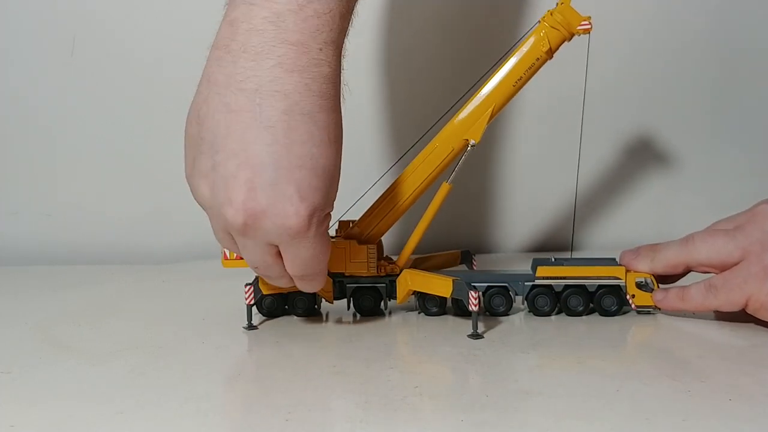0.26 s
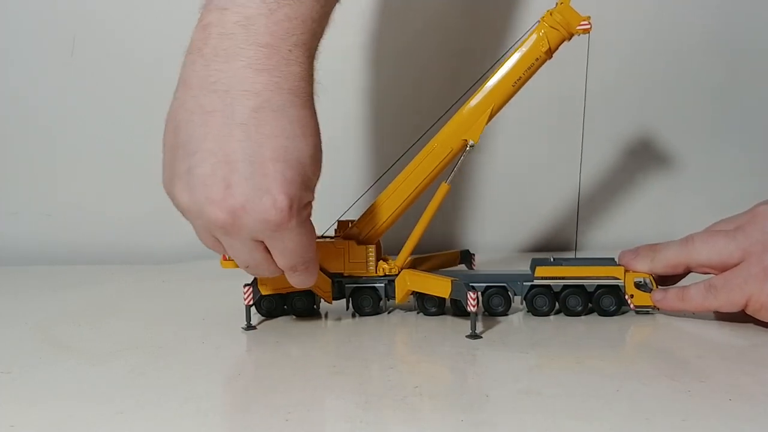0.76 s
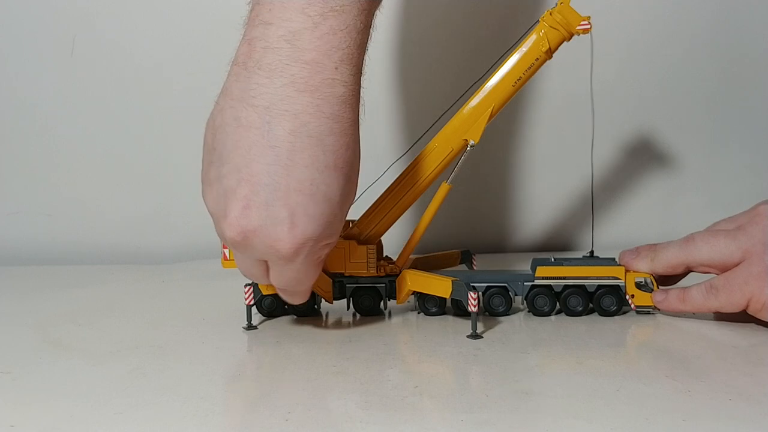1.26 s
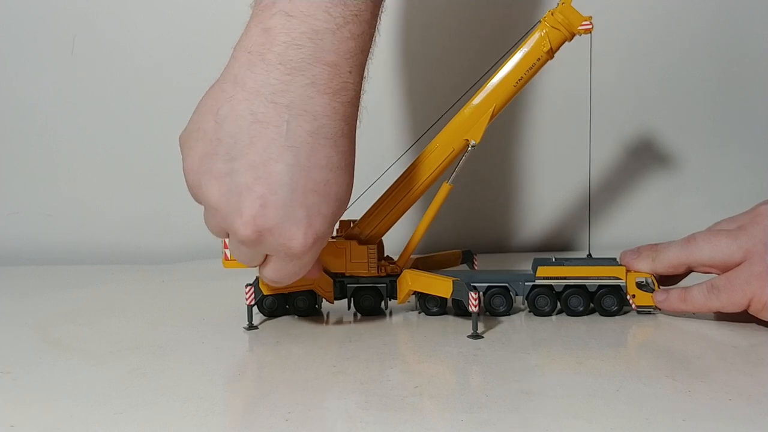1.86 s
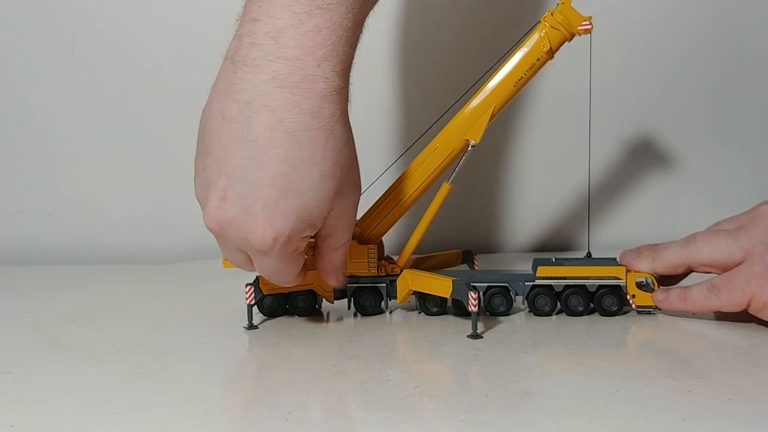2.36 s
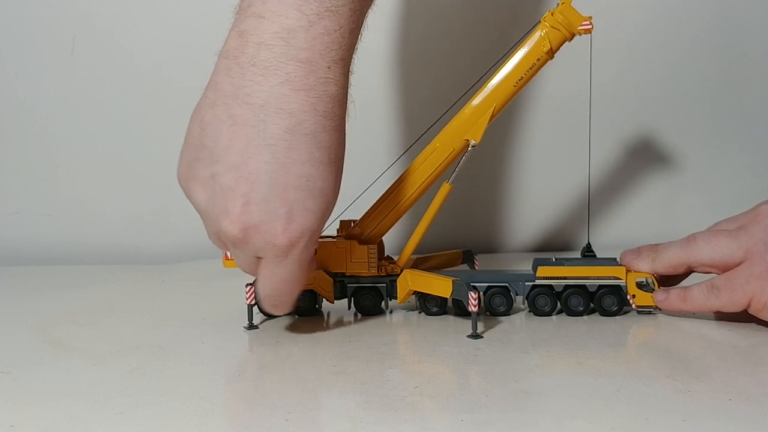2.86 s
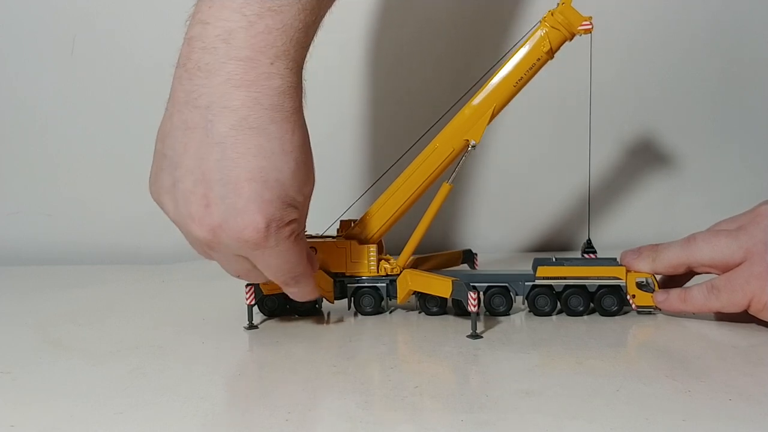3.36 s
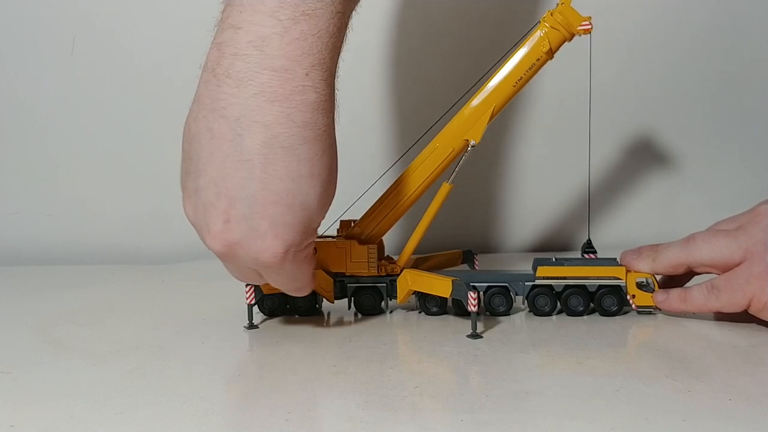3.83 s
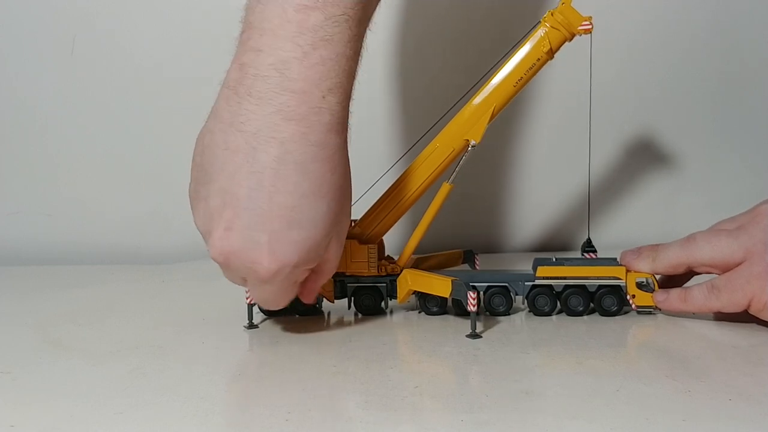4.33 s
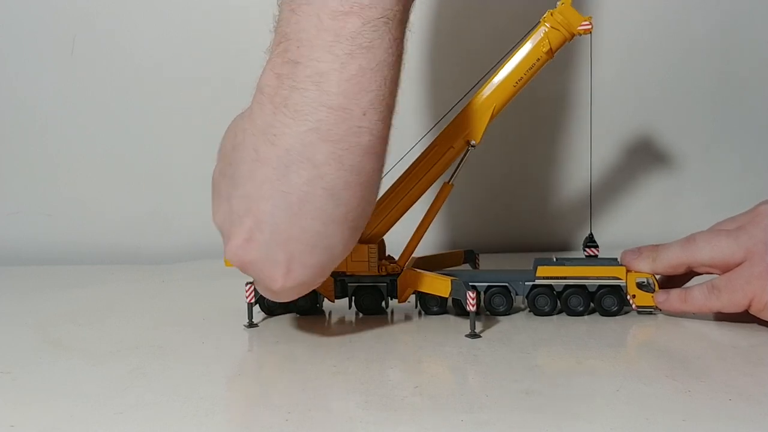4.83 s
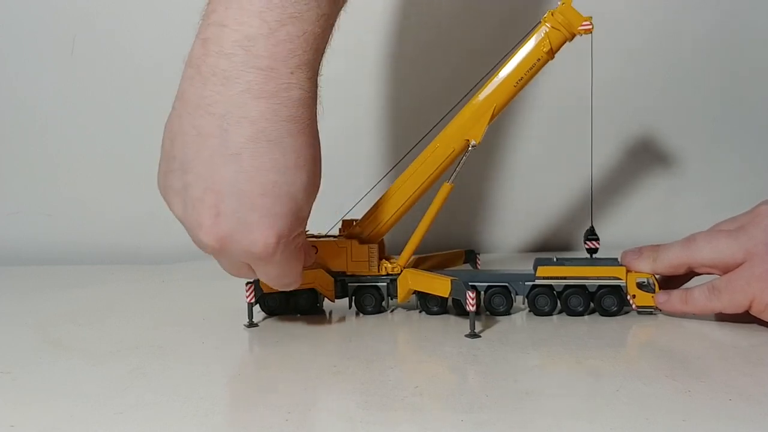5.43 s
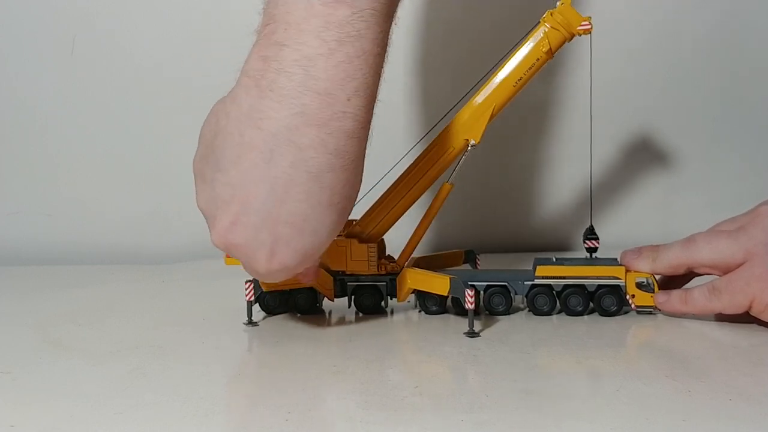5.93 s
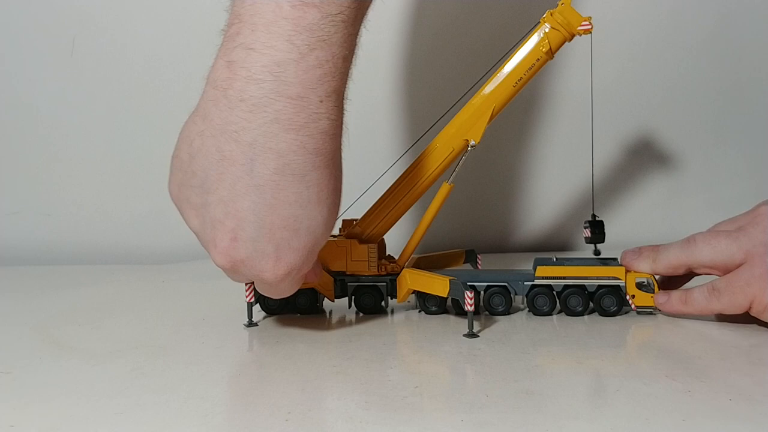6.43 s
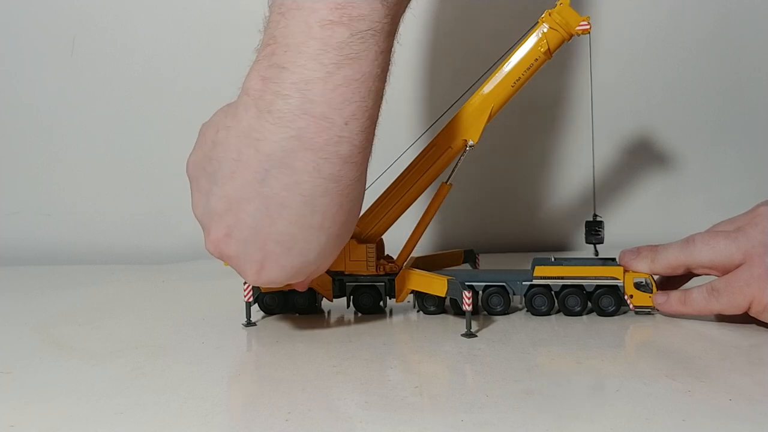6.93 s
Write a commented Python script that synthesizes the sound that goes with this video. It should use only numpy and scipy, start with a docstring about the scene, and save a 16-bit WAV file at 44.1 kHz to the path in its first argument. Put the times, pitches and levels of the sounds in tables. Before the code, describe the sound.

Soft bursts of tiny winch clicks and finger bumps come from a metal toy crane, which briefly rattles on a table.

```python
"""A die-cast model crane, wound by hand with a small key in short turns, on a table in a quiet room.
Heard close, through a camera's microphone. The winch slips in clicks that ring the metal body; the
fingers rub, bump and faintly squeak. The key snaps in its socket, and once it snaps free so that the
chassis rattles on its outriggers. Light taps and small ticks come mostly during the turns."""
import sys
import numpy as np
from scipy import signal
from scipy.fft import rfft, irfft, next_fast_len
from scipy.io import wavfile
from scipy.ndimage import uniform_filter1d

SR = 44100
rng = np.random.default_rng(int(sys.argv[2]) if len(sys.argv) > 2 else 0)


def put_to_file(sound):
    """Save the sound as 16-bit audio at rate SR, in the file named by the first command-line argument."""
    columns = np.atleast_2d(sound).T  # one column per channel
    safe = np.clip(columns, -1, 1)
    whole_steps = np.round(safe * 32767)
    wavfile.write(sys.argv[1], SR, whole_steps.astype(np.int16))


N = 316811
AGE = np.arange(SR // 2) / SR  # seconds since a blow
EASY_STROKE_DB, SCRAPE_GROWTH = -51.5, 0.78  # scrape and faint clicks gain 0.78 dB per dB of effort

# strokes of the fingers on the key: start_s, end_s, effort_db
STROKES = [(-.1, 0.06, -51.5), (0.288, 0.434, -58.5), (0.69, 0.987, -54), (0.974, 1.129, -66),
           (1.237, 1.359, -47), (1.356, 1.538, -52), (1.624, 1.853, -64.5), (1.967, 2.466, -55.5),
           (2.57, 2.676, -44), (3.83, 4.317, -52), (4.002, 4.109, -45), (4.308, 4.433, -52.5),
           (4.73, 4.952, -50), (5.102, 5.352, -61), (5.979, 6.132, -39), (6.13, 6.317, -45.5),
           (6.265, 6.532, -53.5), (6.85, 7.118, -58)]
# rumble of the hand through the table: frequency_hz, gain_db
RUMBLE_COLOUR = [(25, -15.5), (50, -9), (90, 0.5), (170, -6.5), (240, -12), (400, -20), (900, -35),
                 (3000, -59), (7000, -82)]
# scrape of skin on the key: frequency_hz, gain_db
SCRAPE_COLOUR = [(150, 0), (330, 6), (600, 3), (1300, -2), (1800, -8), (2400, -5), (4000, -7), (5000, -18),
                 (6300, -36), (12000, -46)]
# room tone: frequency_hz, gain_db
AIR_COLOUR = [(15, -50), (25, -12), (82, -1), (104, -11), (183, -21.5), (298, -25.5), (340, -11.5),
              (367, -16), (429, -17.5), (797, -29.5), (1010, -29), (1300, -32.5), (2070, -31), (6130, -42),
              (12000, -50), (15600, -87), (22000, -120)]
# a dip in the room tone's treble: frequency_hz, gain_db
AIR_DIP = [(3500, -1.5), (5300, -0.5), (6200, -16), (6900, -11), (7700, -4), (12000, -4)]

# the clearest winch clicks: start_s, level_db
CLICKS = [(.1048, -63.5), (.3479, -52), (.382, -44.5), (.7439, -58.5), (0.8058, -54.5), (.839, -41.5),
          (.906, -57), (0.9299, -52.5), (1.2998, -42), (1.3144, -45), (1.3427, -42), (1.44, -48),
          (1.64, -48.5), (1.7658, -52), (2.0569, -48), (2.149, -53), (2.1755, -37), (2.255, -49),
          (2.328, -53), (2.357, -46.5), (2.5675, -59.5), (2.5907, -73), (2.6524, -49), (3.4664, -59),
          (3.908, -53.5), (3.9996, -36), (4.041, -43), (4.082, -37), (4.1661, -46.5), (4.244, -49),
          (4.348, -45), (4.6329, -53.5), (4.787, -47.5), (4.808, -47), (4.9076, -37), (5.2689, -51.5),
          (6.047, -42.5), (6.0872, -40), (6.1644, -48), (6.172, -44.5), (6.2163, -38), (6.2292, -46.5),
          (6.267, -52.5), (6.3144, -37.5), (6.3738, -49.5), (6.414, -43.5), (6.49, -50), (6.9059, -63),
          (6.986, -58)]
# first crack of a click: frequency_hz, gain_db
CLICK_COLOUR = [(300, -37), (1000, 12.5), (1800, -4.5), (3000, 7.5), (4200, 7), (5000, -3.5), (6200, -20.5),
                (12000, -35)]
# ring of the winch housing: pitch_hz, level_db, t60_s
WINCH_MODES = [(1470, -2, 0.059), (2295, -0.5, 0.071), (3027, 2.5, 0.083), (2860, -9.5, 0.029),
               (3060, -50, .08), (3755, -2.5, 0.05), (3680, 1, 0.1), (3790, 2.5, 0.079), (3667, -9, 0.067),
               (4590, -11, .09), (4560, -3, 0.062), (4770, -11, 0.077)]
# ring of the model on its table top: pitch_hz, level_db, t60_s
BODY_MODES = [(81, -17, 0.95), (191.4, -11, 0.049), (271.7, -3, 0.23), (330, 1, 0.31), (427.6, -2.5, 0.32),
              (512.5, -7, 0.36), (530, -14.5, 0.1), (666, -12.5, 0.23), (769.7, -5.5, 0.25),
              (820, -8, 0.035), (1090, -12.5, 0.035), (1253, -7.5, 0.04)]
# dull knock of the hollow body: frequency_hz, gain_db
HOLLOW_COLOUR = [(100, -15.5), (200, -7), (320, 3.5), (480, 3.5), (730, 0.5), (1300, -11.5), (2500, -20.5),
                 (6000, -56.5)]
# bright edge of a hard contact: frequency_hz, gain_db
EDGE_COLOUR = [(3000, -52), (6300, -12.5), (7300, -2.5), (8700, -0.5), (10000, -9.5), (11300, -13),
               (12500, -3)]
# the key snaps in its socket: start_s, level_db, edge_db, ping_hz
SNAPS = [(0.2745, -53.5, -72.5, 2150), (1.268, -41, -60.5, 2980), (1.276, -36, -73, 2965),
         (1.4484, -35, -80, 2850), (1.493, -35, -49.5, 3700), (1.679, -41.5, -57.5, 3030),
         (1.8629, -52, -67, 2400), (2.965, -61, -74.5, 2478), (4.4466, -49, -68.5, 2560),
         (4.53, -53, -69.5, 2560), (4.8855, -27.5, -44, 2270)]
# first crack of a snap: frequency_hz, gain_db
SNAP_COLOUR = [(300, 4.5), (1000, -26), (1600, 1), (2400, -1), (3400, -8.5), (4800, -2), (6200, -23.5),
               (12000, -104)]

# the fingers bump the model: start_s, level_db, pitch_hz
BUMPS = [(.342, -41.5, 121), (.47, -39, 172.6), (.895, -45, 111), (1.277, -34, 100), (1.303, -53, 100.2),
         (1.493, -40.5, 135), (1.865, -33.5, 170.3), (2.309, -38, 136.7), (2.585, -46, 42.9),
         (2.6, -44, 82.4), (2.592, -37, 162), (2.617, -40.5, 162.8), (4.045, -42, 100), (4.376, -45.5, 330),
         (4.787, -40, 106), (4.89, -34, 169), (6.003, -33, 156), (6.166, -31.5, 97), (6.22, -42, 254.5)]
# small pitched ticks: start_s, level_db, pitch_hz
TICKS = [(1.114, -49, 2265), (1.449, -40, 1850), (1.687, -41.5, 2040), (1.711, -45, 2120),
         (4.303, -47, 2570), (4.531, -42, 2365), (5.683, -48.5, 2325), (6.002, -48.5, 2305),
         (6.02, -48, 2150), (6.035, -44.5, 2260), (6.464, -48, 1414), (6.646, -56, 2250)]
# light taps on the body: start_s, level_db, pitch_hz
TAPS = [(2.176, -45, 780), (2.919, -59, 1475), (3.295, -51.5, 1370), (3.317, -56, 1340),
        (3.967, -47.5, 1271), (4.3635, -42.5, 1120), (4.376, -46.5, 1258), (4.786, -43.5, 1546),
        (4.886, -37.5, 1553), (6.008, -43.5, 950)]

# the chassis rocks on the table and settles: start_s, level_db
BOUNCES = [(4.9377, -23.5), (4.948, -30), (4.9871, -31.5), (5.0129, -34.5), (5.023, -43), (5.057, -37.5),
           (5.082, -48)]
# first crack of an outrigger: frequency_hz, gain_db
BOUNCE_COLOUR = [(300, 8.5), (1000, -2), (1500, 5.5), (2300, 8.5), (3200, 4.5), (4400, 11), (5200, -4),
                 (6200, -31), (12000, -46)]
# ring of the whole chassis and boom: pitch_hz, level_db, t60_s
CHASSIS_MODES = [(1500, -9, .12), (2056, -9, .15), (2256, -7, .12), (2329, -9, .15), (2449, -9, .15),
                 (2650, -10, .17), (3031, -8, .14), (3542, -2, .19), (3650, -2, .19), (3850, -6, .12),
                 (4048, -3, .15), (4274, -5, .14), (4360, -1, .17), (4662, -4, .14), (5063, -11, .12)]
# thud of the outriggers on the table: pitch_hz, level_db, t60_s
THUD_MODES = [(187, -15, 0.29), (252, -3.5, 0.1), (280.5, -0.5, 0.13), (327, -4, 0.19), (367, -11.5, 0.16),
              (453, -9, 0.11), (656, -20.5, 0.068)]

# noise around a damped resonance: pitch_ratio, gain_db
SKIRT = [(1 / 3, -40), (1 / 1.3, -14), (1, 0), (1.3, -14), (2, -40), (8, -80)]
# unequal colour of the microphone's two sides: frequency_hz, left_minus_right_db
BALANCE = [(35, -8.5), (90, 0), (300, 2.5), (600, -0.5), (2500, 0), (3800, 5), (4600, 2.5), (5400, 21.5),
           (6600, 8), (8200, 2), (9500, 2), (12000, -1.5)]
# likeness of the microphone's two channels: frequency_hz, correlation
LIKENESS = [(30, 0.33), (90, 0.79), (200, 1), (500, 0.35), (1500, 0.037), (5000, 0.013)]


def undb(db):
    """Decibels to gain."""
    return 10 ** (np.asarray(db) / 20)


def along(points, hz):
    """Read (Hz, value) points on a log-frequency axis."""
    point_hz, values = np.transpose(points)
    return np.interp(np.log(hz + 1), np.log(point_hz), values)


def colour(x, points):
    """Minimum-phase filter with the given (Hz, dB) response."""
    n = 2 * next_fast_len(x.shape[-1])
    gain = undb(along(points, np.arange(n // 2 + 1) * SR / n))
    cepstrum = irfft(np.log(gain))
    cepstrum[1:n // 2] *= 2
    cepstrum[n // 2 + 1:] = 0
    return irfft(rfft(x, n) * np.exp(rfft(cepstrum)))[..., :x.shape[-1]]


def unit(x):
    """Scale to rms 1."""
    return x / np.sqrt(np.mean(x ** 2))


def unit_attack(x):
    """Scale a blow to rms 1 over its first 23 ms."""
    return x / np.sqrt(np.mean(x[:, :1024] ** 2))


def fade(t60):
    """Decay by 60 dB in t60 seconds."""
    return np.exp(-np.log(1000) * AGE / t60)


def stereo_noise(size):
    """Noise at the microphone: alike on both sides in the bass, unrelated in the treble."""
    mid, side = rfft(rng.standard_normal((2, size)), 2 * next_fast_len(size // 2 + 1))
    likeness = np.clip(along(LIKENESS, np.linspace(0, SR / 2, len(mid))), -1, 1)
    mid, side = mid * np.sqrt(1 + likeness), side * np.sqrt(1 - likeness)
    return unit(irfft(np.array([mid + side, mid - side]))[:, :size])


def add(out, start_s, x):
    """Mix x in at start_s."""
    i = max(int(start_s * SR), 0)
    out[:, i:i + x.shape[1]] += x[:, :max(N - i, 0)]


def ring(modes, scatter_db, detune):
    """Damped modes; each blow shares its force differently among them."""
    hz, db, t60 = np.transpose(modes)[:, :, None]
    size, drift, sign, skew = rng.standard_normal((4, len(modes), 1))
    strength = np.sign(sign) * undb(db + scatter_db * size)
    waves = strength * fade(t60) * np.exp(2j * np.pi * hz * (1 + detune * drift) * AGE)
    turn = np.exp(1j * skew * np.minimum(hz / 1100, .7))  # high modes reach the two sides out of step
    return unit_attack(np.array([(waves * turn).sum(0).imag, (waves / turn).sum(0).imag]))


def crack(points, t60, tail_db, tail_t60):
    """The contact itself: a noise burst and a short wash of dense small-part modes."""
    noise = stereo_noise(len(AGE)) + 0.41 * rng.standard_normal(len(AGE))
    envelope = fade(t60) + undb(tail_db) * fade(tail_t60)
    return unit_attack(colour(noise * envelope, points))


def pips(rows, rise_cycles=4, grit=.7, ring_db=-16, ring_t60=.07, gain_db=0):
    """Each touch swells one resonance for a few cycles and leaves a faint ring; noise roughens it."""
    out = np.zeros((2, N))
    for start_s, db, hz in rows:
        push = AGE * hz / rise_cycles
        envelope = push * np.exp(1 - push) + undb(ring_db) * fade(ring_t60) * (1 - np.exp(-push))
        skirt = [(ratio * hz, gain) for ratio, gain in SKIRT]
        roughness = unit(colour(stereo_noise(len(AGE)), skirt))
        pip = envelope * (np.sin(2 * np.pi * hz * AGE) + grit * roughness)
        add(out, start_s, undb(db + gain_db) * pip / np.abs(pip).max())
    return out


def room_tone(level_db=-62.5, sway_db=1.0, sway_hz=5):
    """Still air all round the microphone; its low rumble sways a little."""
    noise = undb(level_db) * unit(colour(colour(stereo_noise(N), AIR_COLOUR), AIR_DIP))
    low = signal.sosfiltfilt(signal.butter(2, 300, fs=SR, output="sos"), noise)
    steps = np.linspace(0, N / SR, int(sway_hz * N / SR) + 2)
    sway = np.interp(np.arange(N) / SR, steps, rng.standard_normal(len(steps)))
    return noise + (undb(sway_db * sway) - 1) * low


def swells(t):
    """Rise and fall of the strokes at times t, from 0 to 1, one row a stroke."""
    start, end, _ = np.transpose(STROKES)[:, :, None]
    return np.sin(np.pi * np.clip((t - start) / (end - start), 0, 1))


def finger_rub(hold_db=-61, rumble_db=-2, scrape_db=-62, contacts=10, slips_per_s=50, spread_db=6):
    """Skin drags on the key: each stroke swells a rumble through the table and a crackly scrape."""
    effort = np.transpose(STROKES)[2, :, None]
    swell = swells(np.arange(N) / SR)
    rumble_gain = undb(hold_db) + (undb(effort + rumble_db) * swell).sum(0)  # a resting hand trembles
    scrape_gain = (undb(scrape_db + SCRAPE_GROWTH * (effort - EASY_STROKE_DB)) * swell).sum(0)
    scrape = 0
    for _ in range(contacts):  # each point of skin sticks and slips with a colour of its own
        slips = rng.random(N) < slips_per_s / SR
        force = slips * undb(spread_db * np.minimum(rng.exponential(size=N), 2))
        grain = crack(SCRAPE_COLOUR, t60=.022, tail_db=-4, tail_t60=.053)
        scrape += signal.fftconvolve(force[None], grain, axes=1)[:, :N]
    rumble = colour(stereo_noise(N), RUMBLE_COLOUR)
    return rumble_gain * unit(rumble) + scrape_gain * unit(scrape)


def grip(t, rest_db=-64):
    """How hard the fingers press at times t, in dB above an easy stroke."""
    effort = np.transpose(STROKES)[2, :, None]
    pressure = undb(rest_db) + (undb(effort) * swells(t)).sum(0)
    return 20 * np.log10(pressure) - EASY_STROKE_DB


def faint_clicks(count=30, level_db=-58, spread_db=2.5):
    """The winch also slips faintly, at uneven steps while the key turns: rows of start_s, level_db."""
    start, end, _ = np.transpose(STROKES)
    turned_s = np.cumsum(end - start)
    place, size = rng.random((count, 2)).T
    slip_s = turned_s[-1] * (np.arange(count) + place) / count
    stroke = np.searchsorted(turned_s, slip_s)
    start_s = end[stroke] - (turned_s[stroke] - slip_s)
    db = level_db + SCRAPE_GROWTH * grip(start_s) + spread_db * (2 * size - 1)
    return list(zip(start_s, db))


def winch_clicks(firm_db=-42, hardening=.13, coupling=.37, max_grip_db=12):
    """Each slip rings the housing; hard slips are brighter, and a firm grip passes more to the body."""
    out = np.zeros((2, N))
    for start_s, db in CLICKS + faint_clicks():
        edge_db = db + hardening * (db - firm_db)
        body_db = db + coupling * min(grip(start_s)[0], max_grip_db)
        click = undb(db - 15) * crack(CLICK_COLOUR, t60=.052, tail_db=3, tail_t60=.063)
        click += undb(db - 12) * ring(WINCH_MODES, scatter_db=3.5, detune=.012)
        click += undb(body_db - 10.5) * ring(BODY_MODES, scatter_db=4, detune=.04) * fade(.45)
        click += undb(body_db - 16) * crack(HOLLOW_COLOUR, t60=.047, tail_db=-6.5, tail_t60=.11)
        click += undb(edge_db - 28) * crack(EDGE_COLOUR, t60=.038, tail_db=-2, tail_t60=.13)
        add(out, start_s, click)
    return out


def finger_squeaks(count=14, level_db=-61, spread_db=2.5, centre_hz=1993):
    """The fingers squeak very faintly at random moments, pitched within one octave."""
    place, size, pitch = rng.random((count, 3)).T
    start_s = (np.arange(count) + place) / count * N / SR
    db = level_db + spread_db * (2 * size - 1)
    return pips(zip(start_s, db, centre_hz * 2 ** (pitch - .5)))


def key_snaps():
    """The key snaps in its socket, hard and bright, and rings the housing and body."""
    out = np.zeros((2, N))
    for start_s, db, edge_db, _ in SNAPS:
        snap = undb(db - 12) * crack(SNAP_COLOUR, t60=.0053, tail_db=-15, tail_t60=.07)
        snap += undb(db - 20) * ring(WINCH_MODES, scatter_db=0, detune=.0014)
        snap += undb(db - 15) * ring(BODY_MODES, scatter_db=6, detune=.028) * fade(.19)
        snap += undb(edge_db - 1) * crack(EDGE_COLOUR, t60=.0033, tail_db=22, tail_t60=.057)
        add(out, start_s, snap)
    return out


def key_pings():
    """The key gives one short pitched ping with each snap."""
    return pips([(start_s, db, hz) for start_s, db, _, hz in SNAPS], gain_db=2.5)


def finger_bumps():
    """The fingers bump the model: soft, low thumps."""
    return pips(BUMPS, rise_cycles=1.1, grit=.25, ring_db=-12, ring_t60=.13, gain_db=-2.5)


def small_ticks():
    """Small pitched ticks, mostly during the turns, a few in the pauses."""
    return pips(TICKS, rise_cycles=5, grit=.5, gain_db=-1)


def body_taps():
    """A light tap gives a short hollow knock in the body, with no bright crack."""
    out = np.zeros((2, N))
    for start_s, db, _ in TAPS:
        tap = undb(db - 7) * ring(BODY_MODES, scatter_db=3, detune=.03) * fade(.25)
        tap += undb(db - 7) * crack(HOLLOW_COLOUR, t60=.071, tail_db=-7, tail_t60=.11)
        add(out, start_s, tap)
    return out


def tap_tones():
    """The brief pitched part of each tap."""
    return pips(TAPS, gain_db=-1.5)


def chassis_rattle(firm_db=-23, hardening=1.1):
    """The outriggers bounce: the table thuds and the cast metal rings; weak bounces are duller."""
    out = np.zeros((2, N))
    for start_s, db in BOUNCES:
        edge_db = db + hardening * (db - firm_db)
        bounce = undb(db - 12) * crack(BOUNCE_COLOUR, t60=.022, tail_db=-3, tail_t60=.092)
        bounce += undb(db - 19) * ring(CHASSIS_MODES, scatter_db=2, detune=.001)
        bounce += undb(db - 9) * ring(THUD_MODES, scatter_db=2, detune=.01)
        bounce += undb(edge_db - 25) * crack(EDGE_COLOUR, t60=.016, tail_db=-5, tail_t60=.11)
        add(out, start_s, bounce)
    return out


def zing(start_s=4.945, length_s=.18, pitch_hz=8130, wobble_hz=160, level_db=-66):
    """A thin high ring swells and dies while the chassis rattles."""
    out = np.zeros((2, N))
    window = int(SR / wobble_hz / 2)
    noise = rng.standard_normal((2, len(AGE)))
    wobble = unit(uniform_filter1d(uniform_filter1d(noise, window), window))
    swell = np.sin(np.pi * np.minimum(AGE / length_s, 1))
    add(out, start_s, undb(level_db) * swell * wobble * np.sin(2 * np.pi * pitch_hz * AGE))
    return out


def room(direct, wet_db, t60, low_t60=.35, build_s=.0027):
    """A small furnished room heard near the source: direct sound leads, and the bass lingers longest."""
    tail = stereo_noise(len(AGE)) * fade(t60)
    tail += colour(stereo_noise(len(AGE)), [(300, -.5), (1200, -5), (5000, -60)]) * fade(low_t60)
    tail *= 1 - np.exp(-AGE / build_s)
    tail /= np.sqrt(np.sum(tail ** 2) / 2)
    return direct + undb(wet_db) * signal.fftconvolve(direct, tail, axes=1)[:, :N]


def microphone_ports(stereo):
    """The microphone's two ports colour the sound differently; the left is brighter around 4-7 kHz."""
    left = colour(stereo[0], [(hz, db / 2) for hz, db in BALANCE])
    right = colour(stereo[1], [(hz, -db / 2) for hz, db in BALANCE])
    return np.array([left, right])


def scene():
    """The model close by in the still room; its squeaks, pings and ticks carry more of the room."""
    model = finger_bumps() + winch_clicks() + key_snaps() + chassis_rattle()
    model += body_taps() + zing() + finger_rub()
    model = microphone_ports(room(model, wet_db=-11, t60=.15))
    pitched = finger_squeaks() + key_pings() + tap_tones() + small_ticks()
    return model + room(pitched, wet_db=-6.5, t60=.14) + room_tone()


def record(dry, top_hz=11850):
    """The camera cuts the top treble steeply."""
    return signal.sosfilt(signal.ellip(8, .2, 60, top_hz, fs=SR, output="sos"), dry)


dry = scene()
out = record(dry)
put_to_file(out)
```